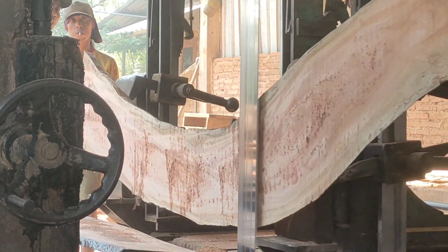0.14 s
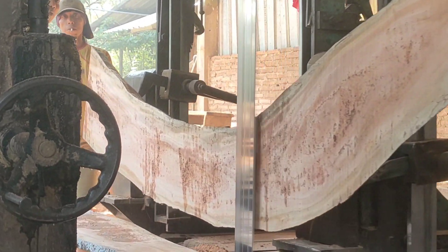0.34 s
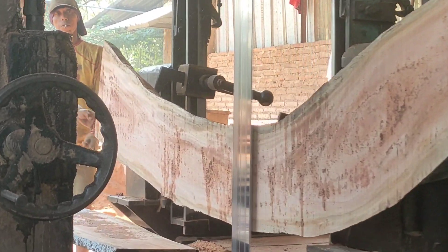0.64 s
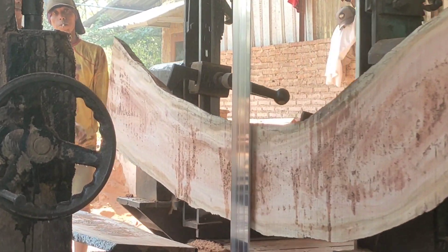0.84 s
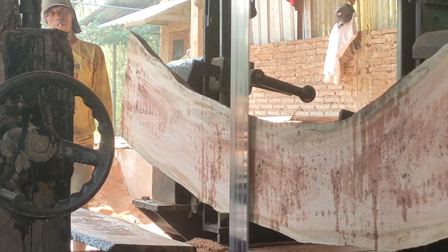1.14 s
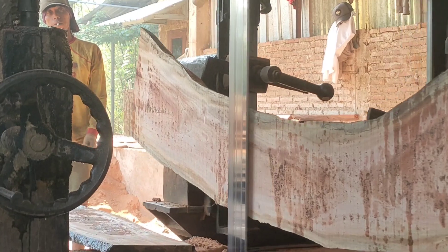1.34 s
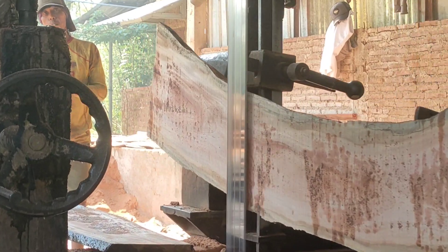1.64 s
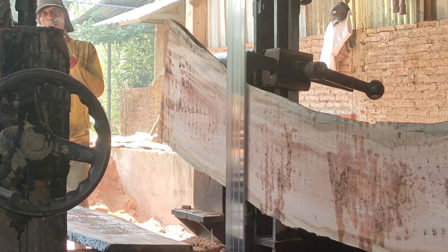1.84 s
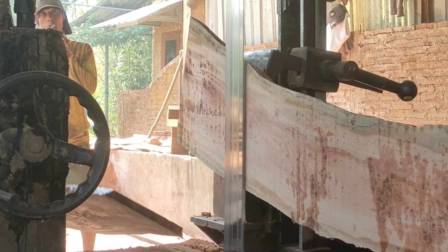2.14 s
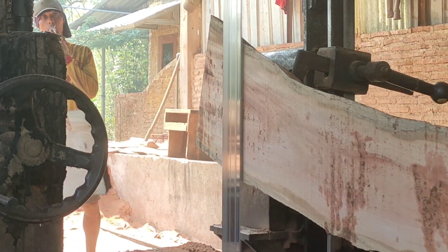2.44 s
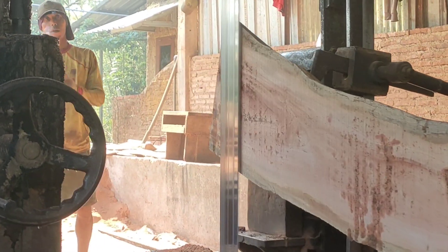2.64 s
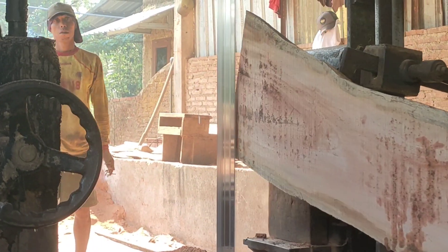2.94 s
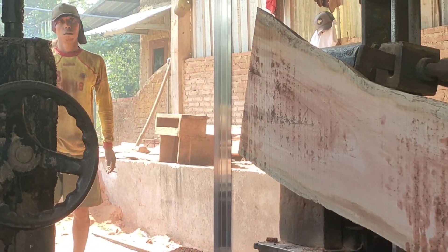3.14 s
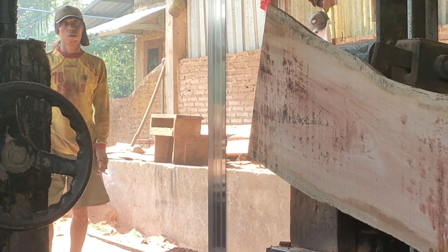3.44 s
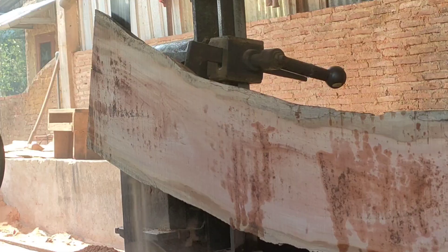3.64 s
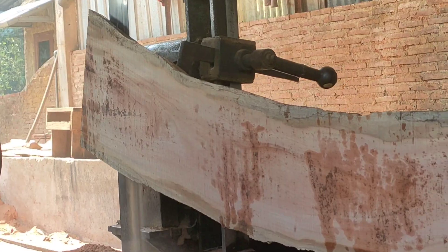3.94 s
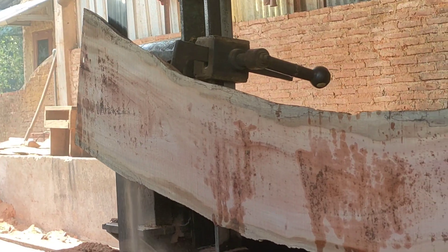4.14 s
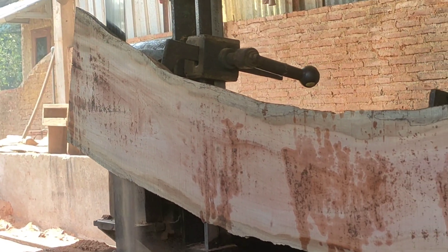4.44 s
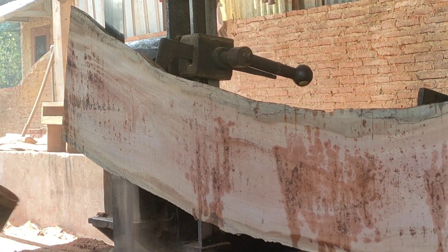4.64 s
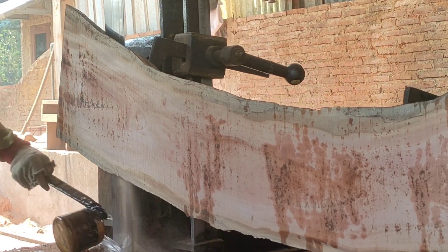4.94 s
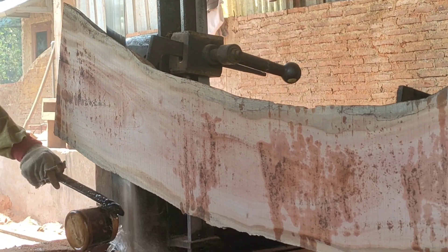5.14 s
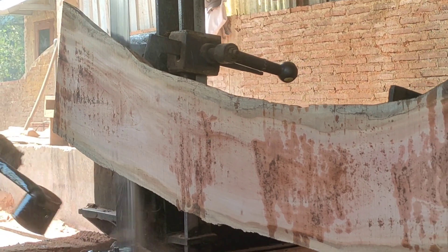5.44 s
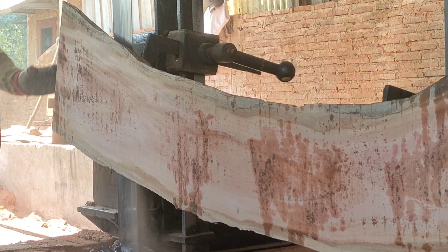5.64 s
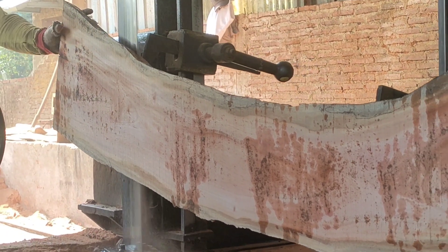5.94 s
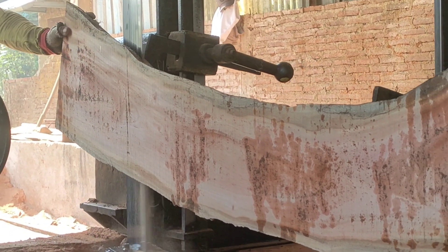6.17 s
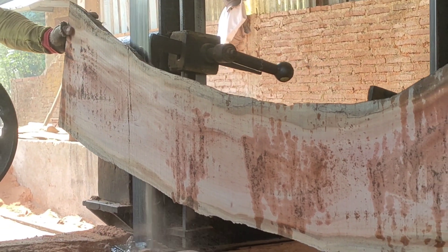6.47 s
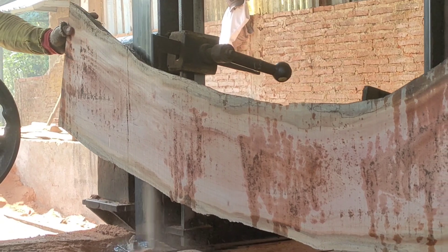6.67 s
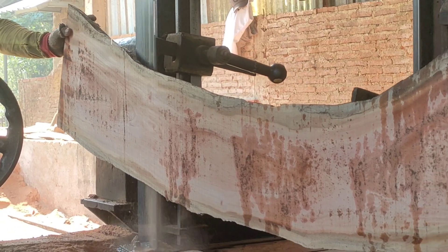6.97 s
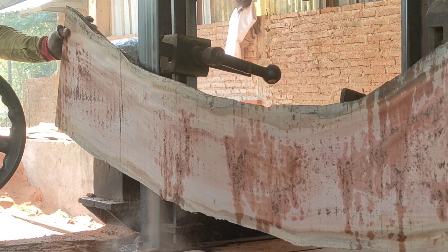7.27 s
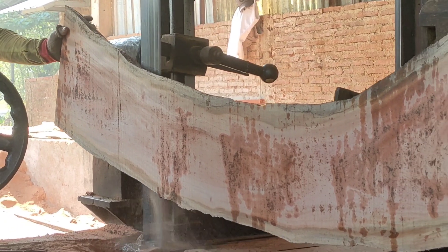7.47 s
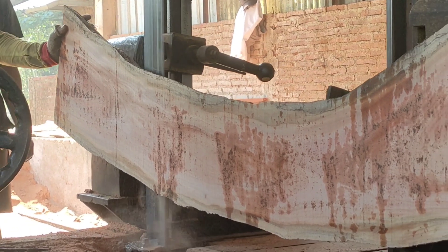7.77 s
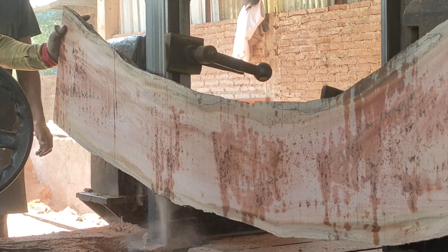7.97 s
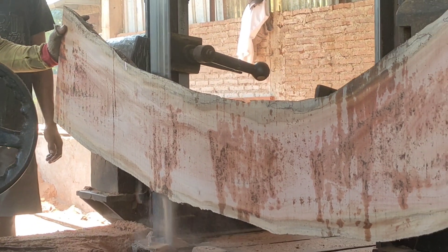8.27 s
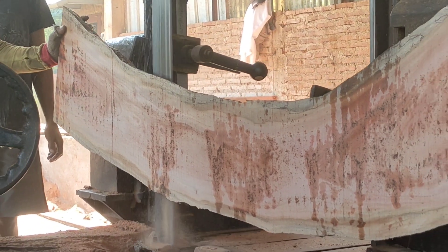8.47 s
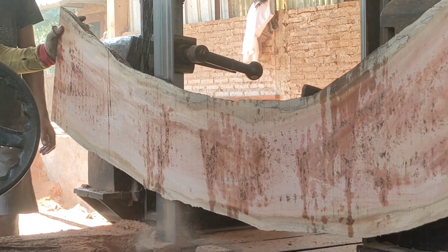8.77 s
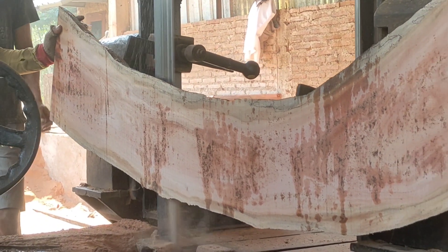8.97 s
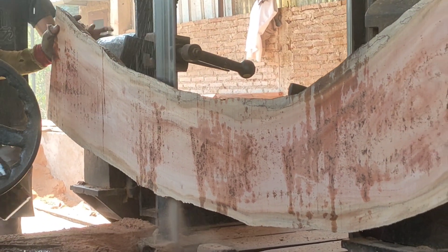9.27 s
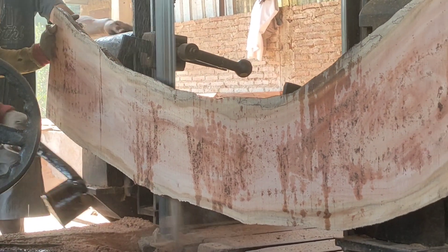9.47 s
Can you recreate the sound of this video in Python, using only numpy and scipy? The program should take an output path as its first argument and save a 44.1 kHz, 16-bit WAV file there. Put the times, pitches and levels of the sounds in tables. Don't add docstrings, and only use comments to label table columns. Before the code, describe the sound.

A wide, continuous rush of saw blade noise fills the stereo field, with a low, centred motor drone and faint wavering whines from the metal frame. First the blade idles, hollow and bright, as the engine speeds up. After an abrupt tiny gap the noise swells in thin, a soft bass thump lands, and steady cutting follows with airy dust spray, a rougher rumble and a labouring engine. Close microphone, open timber shed.

```python
import sys
import numpy as np
from scipy import signal
from scipy.fft import rfft, irfft, next_fast_len
from scipy.io import wavfile
from scipy.ndimage import uniform_filter1d

SR = 44100
rng = np.random.default_rng(int(sys.argv[2]) if len(sys.argv) > 2 else 0)


def output_pcm(signal):
    pcm = np.clip(np.atleast_2d(signal).T, -1, 1) * 32767
    wavfile.write(sys.argv[1], SR, np.round(pcm).astype(np.int16))


def ratio_of_db(decibels):
    return 10 ** (np.asarray(decibels, float) / 20)


N = 423801

CUT_S, RESUME_S = 3.5873, 3.6125
BASS_BACK_S = 3.9835
RUN_UP_S = 2.1
SIDE = np.array([[.5], [-.5]])


def saw():
    # f/Hz, level/dB per Hz
    roar_spectrum = [(700, -21), (1100, -11.5), (1400, -6), (1950, -5), (2100, -6), (3000, -5), (3600, -6),
                     (3900, -7.5), (4400, -7.5), (4850, -11), (5450, -11), (6100, -15.5), (6700, -16),
                     (7300, -21.5), (9000, -33)]
    ring_spectrum = [(320, -27), (550, -7), (705, -4.5), (786, -2), (1210, -2.5), (1500, -8), (1950, -53),
                     (3300, -120)]
    rumble_spectrum = [(12, -30), (22, -26), (40, -12.5), (80, -7.5), (130, -6), (170, -1), (200, -6),
                       (250, -4), (400, -3), (500, -3.5), (700, -12), (780, -9.5), (1000, -62)]
    idle_spectrum = [(5500, -13), (7000, -14), (7600, 1.5), (8700, -5.5), (10200, 1.5), (11500, -2.5),
                     (13000, -5.5), (14300, -7.5), (14900, -10), (15450, -14)]
    spray_spectrum = [(5500, -22), (7000, -2), (7500, -10), (8300, -1.5), (8900, -3), (11200, 1),
                      (12500, -4.5), (13600, 1), (14300, -3), (15500, -6.5)]
    # f/Hz, width/Hz, level above surroundings/dB
    blade_modes = [(2050, 32, -2), (2230, 70, -7), (2409, 35, -3), (2655, 30, -11), (3908, 170, -6),
                   (4873, 50, -9), (6080, 300, -3)]
    frame_modes = [(243, 25, -1), (759, 9, -4), (785, 25, -6), (813, 6, -4), (867, 6, -3), (909, 6, -4),
                   (995, 9, 0), (1077, 7, -5)]

    roar_db, ring_db, treble_db, rumble_db = saw_levels()
    feed = drift(16)

    roar = contacts(spread_db=0.96)
    roar = patchy(roar, roar_spectrum, feed, shared_db=0.45, own_db=0.2, own_rate_hz=14, count=4)
    roar = with_modes(roar, blade_modes, swell_db=1.8, swell_rate_hz=1.5)

    ring = contacts(spread_db=2.0)
    ring = patchy(ring, ring_spectrum, feed, shared_db=1.0, own_db=-0.13, own_rate_hz=11.0, count=2)
    rumble = contacts(spread_db=1.6)
    rumble = patchy(rumble, rumble_spectrum, feed, shared_db=-0.77, own_db=-0.55, own_rate_hz=3.0, count=2)
    frame = ratio_of_db(ring_db) * ring + ratio_of_db(rumble_db) * rumble
    frame = with_modes(frame, frame_modes, swell_db=1.5, swell_rate_hz=1.2) * np.std(frame)

    dust = contacts(spread_db=1.5)
    idle_air = patchy(dust, idle_spectrum, feed, shared_db=-0.1, own_db=-0.2, own_rate_hz=13, count=2)
    spray = patchy(dust, spray_spectrum, feed, shared_db=0.6, own_db=0.3, own_rate_hz=15, count=2)
    treble = np.where(np.arange(N) < CUT_S * SR, idle_air, spray)

    firing_hz = engine_state()[0]
    throb_db = 0.35 * np.sin(2 * np.pi * np.cumsum(firing_hz) / SR)
    return ratio_of_db(roar_db + throb_db) * idling(roar) + frame + ratio_of_db(treble_db) * treble


def saw_levels():
    t, since, cutting = clock()
    ring_db = -28.5 - 1.5 * np.exp(-since / RUN_UP_S) * ~cutting
    spray_db = -36.5
    idle_air_db = -41.5 - 0.5 * since
    treble_db = np.where(cutting, spray_db, idle_air_db)
    rumble_db = -37 + 1.5 * hard_wood(t)
    return -19, ring_db, treble_db, rumble_db


def idling(roar):
    # low/Hz, high/Hz, share added while idling
    idle_colour = [(1150, 1780, -0.16), (3150, 3550, 0.27), (3900, 5000, 0.071), (5150, 5350, 0.089)]
    shift = 0
    for low_hz, high_hz, share in idle_colour:
        band = signal.butter(1, [low_hz, high_hz], "band", fs=SR, output="sos")
        shift = shift + share * signal.sosfilt(band, roar)
    return roar + shift * (np.arange(N) < CUT_S * SR)


def contacts(spread_db):
    size_db = spread_db * rng.standard_normal((3, N))
    return rng.standard_normal((3, N)) * ratio_of_db(size_db)


def patchy(sources, spectrum, together, shared_db, own_db, own_rate_hz, count):
    pair, hz = ports(sources, spectrum)
    low_hz, high_hz = spectrum[0][0], spectrum[-1][0]
    place = np.log(hz[1:] / low_hz) / np.log(high_hz / low_hz) * (count - 1)
    out = 0
    for k in range(count):
        share = np.r_[0, np.clip(1 - abs(place - k), 0, 1)]
        flicker_db = shared_db * together + own_db * drift(own_rate_hz)
        out = out + irfft(pair * share)[:, :N] * ratio_of_db(flicker_db)
    return rms_one(out)


def ports(sources, spectrum):
    # f/Hz, share common to both ports
    common_table = [(40, .999), (180, .997), (250, .95), (380, .8), (500, .5), (800, .58), (1000, .42),
                    (1300, .52), (1900, .25), (2400, .4), (3500, .25), (4600, .1), (5800, .4), (8000, .1),
                    (15000, .1)]
    # f/Hz, left lead/rad
    lead_table = [(0, 0), (400, .1), (860, 1.1), (1300, 3.1), (1640, 4.1), (2000, 6.3), (2400, 7),
                  (3300, 8.8), (4200, 8.3), (5500, 6.3), (7400, 6.4), (11000, 9.4)]
    # f/Hz, left minus right/dB
    tilt_table = [(60, -0.3), (400, 0.6), (740, -0.6), (1220, -2), (1700, -4.3), (2500, -3.2), (3300, -1.9),
                  (3800, 2.2), (4000, 2.6), (4250, 1.2), (6000, 0.6), (7600, -2), (8300, -5), (9500, -2.5),
                  (15000, 0.8)]

    size = next_fast_len(N)
    hz = np.arange(size // 2 + 1) * SR / size
    direct, *diffuse = rfft(sources, size)
    common = np.clip(at_hz(common_table, hz), 0, 1)
    lead_rad = np.interp(hz, *np.transpose(lead_table))
    pair = np.sqrt(common) * direct * np.exp(1j * SIDE * lead_rad)
    pair = pair + np.sqrt(1 - common) * np.array(diffuse)
    level_db = at_hz(spectrum, hz) + SIDE * at_hz(tilt_table, hz)
    inside = (hz > spectrum[0][0]) & (hz < spectrum[-1][0])
    return pair * ratio_of_db(level_db) * inside, hz


def with_modes(x, modes, swell_db, swell_rate_hz):
    out = x.copy()
    for hz, width_hz, level_db in modes:
        r = np.exp(-np.pi * width_hz / SR)
        poles = [1, -2 * r * np.cos(2 * np.pi * hz / SR), r * r]
        zeros = [(1 - r * r) / 2, 0, (r * r - 1) / 2]
        gain = ratio_of_db(level_db + swell_db * drift(swell_rate_hz))
        out += signal.lfilter(zeros, poles, x) * gain
    return rms_one(out)


def singing():
    # f/Hz, start/s, end/s, level/dB
    whines = [(756, .2, 2.0, -44), (813, .3, .9, -44), (936, .7, 1.1, -42), (814, 1.3, 1.9, -40),
              (815, 2.4, 2.75, -40), (907, 2.3, 3.2, -44), (1077, 2.1, 2.8, -45), (1078, 3.2, 3.6, -44),
              (760, 2.4, 3.6, -46), (863, 2.7, 3.3, -41.5), (996, 3.7, 4.5, -46), (868, 3.9, 5.3, -41),
              (911, 4.0, 5.6, -44), (1130, 3.9, 5.0, -43.5), (763, 4.8, 5.8, -43), (812, 6.0, 7.1, -43),
              (910, 6.2, 6.8, -44), (1077, 6.1, 6.5, -46), (764, 7.2, 8.1, -45), (996, 7.3, 8.6, -47),
              (911, 7.8, 9.2, -47), (813, 8.7, 9.4, -44), (868, 9.3, 9.8, -43), (2409, .2, 1.6, -43),
              (2055, 3.9, 4.7, -42), (2150, 3.9, 4.7, -42), (2048, 5.2, 6.8, -45), (1077, 0, .2, -44),
              (812, 4.0, 4.7, -44), (941, 1.5, 2.5, -43.5), (862, .3, 2.4, -47), (996, 0, 2.6, -47),
              (1110, 1.5, 2.5, -46), (1122, 2.6, 3.5, -46), (1117, 5.5, 7.2, -45), (868, 6.4, 8.4, -48),
              (1450, 1.2, 3.6, -47), (2050, 2.7, 3.6, -43), (243, 1.9, 2.9, -49), (243, 3.9, 4.3, -49)]
    # f/Hz, left lead/rad
    whine_lead = [(243, 0), (760, 1), (865, 1.2), (910, .6), (940, .3), (1077, 0), (1115, 3.6), (1450, 3.6),
                  (2050, 6.4), (2410, 7)]
    # f/Hz, left minus right/dB
    whine_tilt = [(243, 0), (760, 0), (865, -2), (910, -5), (996, -3), (1077, -9), (1130, -9), (1450, -3),
                  (2410, -3.5)]
    edge_s, waver_share, flutter_db = 0.2, 0.001, 1.6

    t, out = np.arange(N) / SR, np.zeros((2, N))
    waver = [drift(4) for _ in range(4)]
    flutter = [drift(6) for _ in range(5)]
    for k, (hz, start_s, end_s, level_db) in enumerate(whines):
        on = slice(int(max(start_s - edge_s, 0) * SR), int((end_s + edge_s) * SR))
        turn = 2 * np.pi * hz * np.cumsum(1 + waver_share * waver[k % 4][on]) / SR
        swell = np.clip(np.minimum(t[on] - start_s, end_s - t[on]) / edge_s + 1, 0, 1)
        port_db = level_db + flutter_db * flutter[k % 5][on] + SIDE * at_hz(whine_tilt, hz)
        whine = np.sin(turn + SIDE * at_hz(whine_lead, hz))
        out[:, on] += np.sqrt(2) * swell * ratio_of_db(port_db) * whine
    return out


def engine():
    # multiple of firing rate, level re firing line/dB
    shaft_orders = [(1 / 3, -27), (2 / 3, -20), (4 / 3, -21), (5 / 3, -19)]

    firing_hz, firing_db, pulley_db, double_db = engine_state()
    turn = 2 * np.pi * np.cumsum(firing_hz + 0.35 * drift(3.2)) / SR
    turn = turn - turn[int(BASS_BACK_S * SR)]
    firing_phase_rad = -1.13
    hum = ratio_of_db(firing_db + 1.4 * drift(47)) * np.sin(turn + firing_phase_rad)
    hum += ratio_of_db(pulley_db + 1.3 * drift(3.2)) * np.sin(2.0585 * turn + np.pi)
    hum += ratio_of_db(double_db) * np.sin(2 * turn)
    for multiple, level_db in shaft_orders:
        order_db = firing_db + level_db + 3 * drift(2.5)
        hum += ratio_of_db(order_db) * np.sin(multiple * turn + rng.uniform(0, 2 * np.pi))
    return np.sqrt(2) * hum


def engine_state():
    t, since, cutting = clock()
    free_hz, run_up_hz = 58.9, 2.7
    loaded_hz, sag_hz, sag_s = 53.2, 2.7, 6.0
    idle_hz = free_hz - run_up_hz * np.exp(-since / RUN_UP_S)
    hz = np.where(cutting, loaded_hz + sag_hz * np.exp(-since / sag_s), idle_hz)
    firing_db = -36.5 + 0.6 * (free_hz - hz) + 2 * hard_wood(t)
    pulley_db = np.minimum(-50 + 3 * since, -42.5)
    double_db = np.minimum(-56 + 15 * np.maximum(55.75 - hz, 0), -46)
    return hz, firing_db, pulley_db, double_db


def hard_wood(t):
    from_s, to_s, edge_s = 4.65, 8.7, 0.79
    return np.clip(np.minimum(t - from_s, to_s - t) / edge_s, 0, 1)


def clock():
    t = np.arange(N) / SR
    cutting = t > CUT_S
    return t, np.where(cutting, np.maximum(t - RESUME_S, 0), t), cutting


def drift(rate_hz):
    r = np.exp(-80 * np.pi * rate_hz / SR)
    noise = rng.standard_normal(N // 40 + 2002)
    slow = rms_one(signal.lfilter([1], [1, -2 * r, r * r], noise)[2000:])
    return np.interp(np.arange(N) / 40, np.arange(len(slow)), slow)


def at_hz(points, hz):
    points = np.array(points)
    return np.interp(np.log(hz + 1), np.log(points[:, 0] + 1), points[:, 1])


def rms_one(x):
    return x / np.sqrt(np.mean(x ** 2) + 1e-20)


def scene():
    return saw() + singing() + engine()


def bass_cut(dry):
    t, since, cutting = clock()
    done = fade_in()[1]
    thinner, thin = [signal.sosfilt(signal.butter(1, hz, "high", fs=SR, output="sos"), dry)
                     for hz in (380, 180)]
    return np.where(cutting & (t < BASS_BACK_S), done * thin + (1 - done) * thinner, dry)


def thump():
    after = np.maximum(np.arange(N) / SR - BASS_BACK_S, 0)
    t60_s = 0.1
    rise = 1 - np.exp(-after / 0.0007)
    swing = ratio_of_db(-10.5 - 60 * after / t60_s) * rise * np.cos(2 * np.pi * 30 * after)
    return swing * ratio_of_db(np.array([[-22], [0]]))


def drop_weak_lines(x, spread_db):
    # f/Hz, drop threshold re local level/dB
    dead_zone = [(1000, -8), (1400, -2.5), (2200, -8), (3000, -5), (4300, -1.5), (5000, .8), (6500, .5),
                 (9000, 0), (13000, 0), (15000, 1.5)]
    # f/Hz, width/Hz, extra threshold/dB
    starved = [
        [(5100, 200, 2.5), (4750, 60, 2), (5800, 50, 1), (6740, 50, 7), (7350, 120, 4), (8000, 200, 3),
         (8850, 200, 4.5), (11950, 90, 5), (12650, 150, 5), (13650, 250, 2.5)],
        [(3270, 90, 1.5), (3650, 120, 1.5), (5100, 100, 1.5), (6760, 60, 9), (7350, 200, 6.5), (8850, 100, 4.5),
         (9400, 80, 3), (10900, 100, 5), (11900, 120, 4.5), (12600, 120, 3), (13700, 250, 7), (14750, 80, 1.5)],
    ]
    # f/Hz, deepest drop/Hz, share of frames that drop
    ceiling = [(15480, 1100, .9), (15490, 900, .8)]

    window = np.sqrt(np.hanning(2049)[:-1])
    hz, s, lines = signal.stft(x, SR, window, nperseg=2048)
    power = np.mean(abs(lines) ** 2, axis=0)
    local = uniform_filter1d(uniform_filter1d(power, size=41, axis=0), size=5, axis=1)

    idle, cut = [sum(db * np.exp(-.5 * ((hz - f) / width) ** 2) for f, width, db in bands)
                 for bands in starved]
    starved_db = np.where(s < CUT_S, idle[:, None], cut[:, None])
    waver = rng.standard_normal((len(hz) // 8 + 1, len(s)))
    waver = np.repeat(waver, 8, axis=0)[:len(hz)]
    threshold_db = at_hz(dead_zone, hz)[:, None] + starved_db + spread_db * waver
    kept = power > local * ratio_of_db(threshold_db) ** 2

    top_hz, drop_hz, share = np.where(s < CUT_S, *np.array(ceiling)[:, :, None])
    luck = np.repeat(rng.random((2, len(s) // 2 + 1)), 2, axis=1)[:, :len(s)]
    depth = luck[0] ** np.where(s < CUT_S, 1, 4)
    kept &= hz[:, None] < top_hz - drop_hz * depth * (luck[1] < share)
    return signal.istft(lines * kept, SR, window, nperseg=2048)[1][:, :N]


def fade_in():
    t, since, cutting = clock()
    fade_s, overshoot_db, settle_s = 0.26, 1.4, 0.7
    done = np.clip(since / fade_s, 0, 1)
    settling = np.exp(-np.maximum(since - fade_s, 0) / settle_s)
    fade = done ** 0.5 * ratio_of_db(overshoot_db * settling)
    trace = ratio_of_db(-60 - 1700 * np.maximum(t - CUT_S, 0))
    return np.where(cutting, fade + trace, 1), done


def low_pass(x):
    return signal.sosfilt(signal.butter(12, 15710, fs=SR, output="sos"), x)


def record(dry):
    heard = drop_weak_lines(bass_cut(dry) + thump(), spread_db=3.2)
    gain, _ = fade_in()
    return low_pass(heard * gain)


dry = scene()
out = record(dry)
output_pcm(out)
```